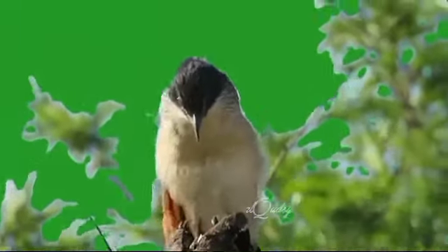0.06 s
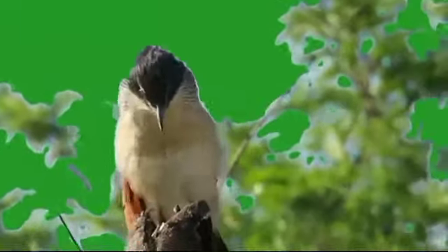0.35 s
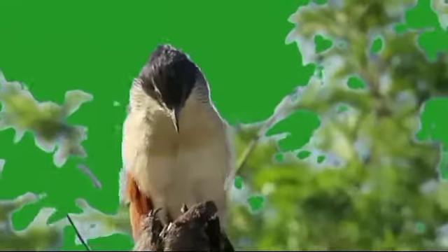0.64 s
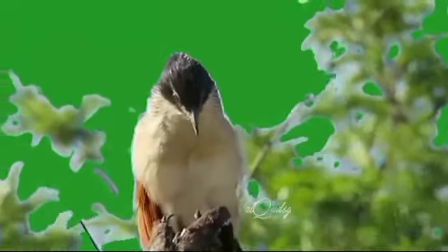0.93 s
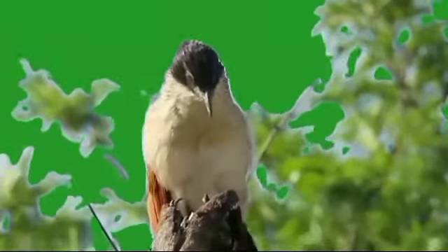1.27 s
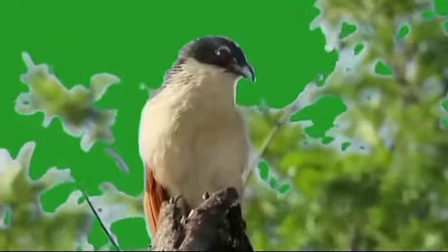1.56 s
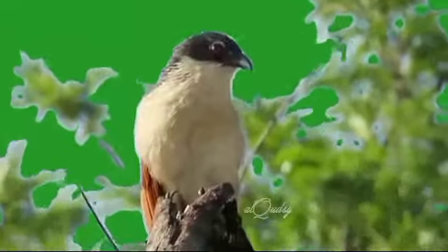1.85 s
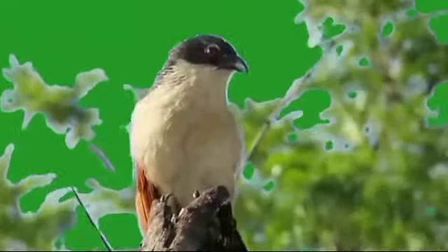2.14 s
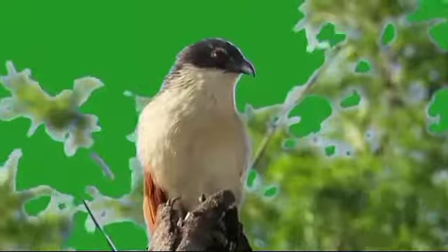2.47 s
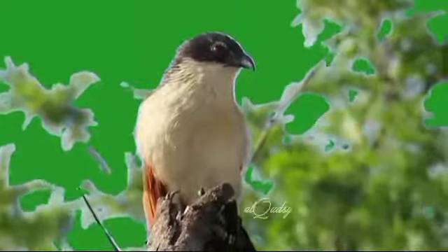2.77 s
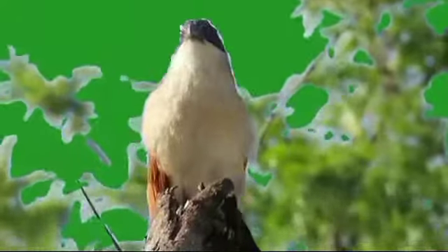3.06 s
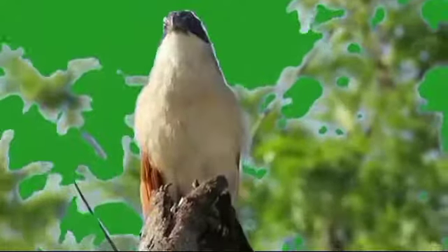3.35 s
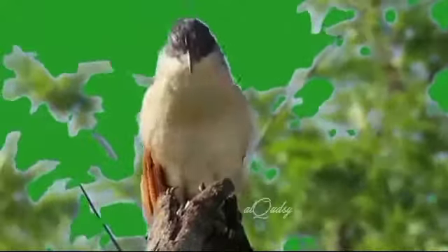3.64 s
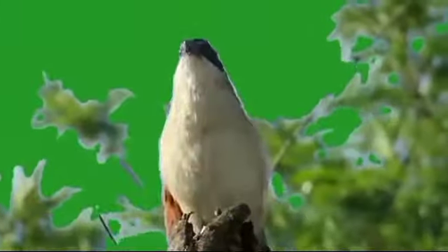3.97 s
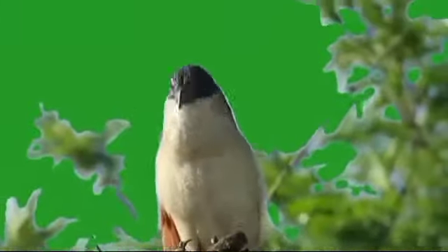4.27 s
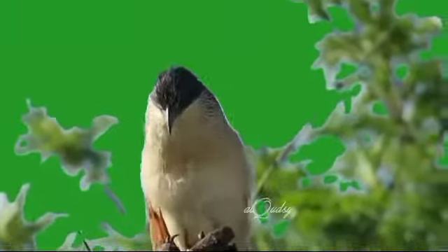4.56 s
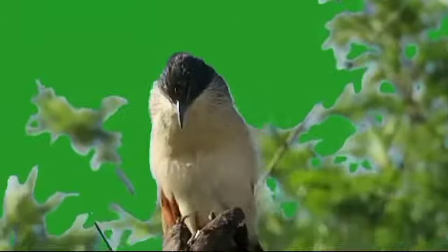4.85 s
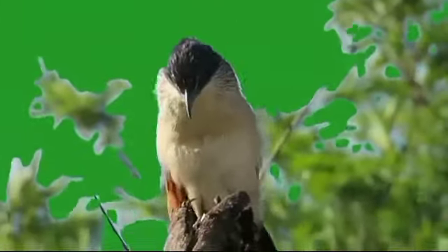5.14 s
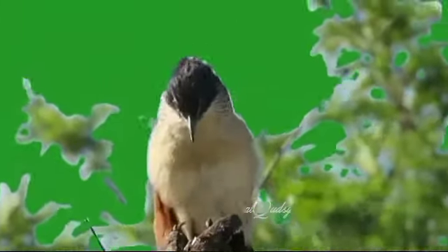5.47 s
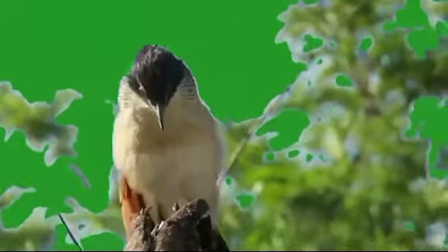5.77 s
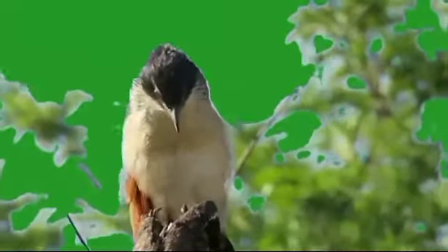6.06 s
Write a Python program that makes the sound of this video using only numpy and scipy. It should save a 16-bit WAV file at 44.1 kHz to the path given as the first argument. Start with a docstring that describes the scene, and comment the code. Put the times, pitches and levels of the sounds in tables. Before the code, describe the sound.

Low, pure bird hoots tumble downward in repeated runs in the bush, amid steady crickets and the thin whistles of small birds.

```python
"""In the bush, a coucal (a large cuckoo) on a stump hoots in quick falling runs, and others answer.
The hoots are almost pure tones from a swollen throat. Crickets rub their wings to chirp near 5 kHz,
and higher insects trill and buzz. Small birds throw in thin whistles and sharp chips, the chips sung
with both sides of the voice box at once. Everything scatters off trunks and leaves, over a soft hush.
Two soft gusts rumble on the microphone; the loudest chips overload it."""
import sys
import numpy as np
from scipy import signal
from scipy.io import wavfile
from scipy.ndimage import uniform_filter1d, map_coordinates

SR = 44100
rng = np.random.default_rng(int(sys.argv[2]) if len(sys.argv) > 2 else 0)


def wrap_up_sound(samples):
    """Save the sound to the file named by the first command line argument, as 16-bit audio."""
    columns = np.atleast_2d(samples).T
    # keep every value between -1 and 1, then stretch to whole-number steps
    tamed = np.clip(columns, -1, 1)
    steps = np.round(tamed * 32767).astype(np.int16)
    wavfile.write(sys.argv[1], SR, steps)


N = 269451
TIME = np.arange(N) / SR

# runs of the near coucals: (start [s], cut-off time [s], level [dB], pitch of first falling hoot [Hz])
NEAR_RUNS = [(-.856, .906, -7, 445), (1.464, 3.24, -3.6, 446), (3.712, 3.99, -13.5, 444),
             (4.554, 6.03, -7.3, 448), (5.835, 6.15, -4.2, 449)]
# the long and the short hoot that open a run: (delay [s], length [s], extra level [dB])
OPENING_HOOTS = [(0, .117, 1), (.158, .05, -.5)]
# runs of farther coucals:
# (first hoot [s], last hoot [s], step [s], first pitch [Hz], last pitch [Hz],
#  first level [dB], last level [dB])
FAR_RUNS = [(0.146, 1.391, .125, 454, 421.5, -40, -34), (2.45, 4.22, .099, 445, 403, -20.5, -27),
            (3.02, 3.92, .112, 358, 326, -24.5, -35)]
# chirps of the nearest cricket: (time [s], level [dB])
NEAR_CHIRPS = [(.133, -8), (.442, -10), (.781, -10), (1.115, -11), (1.41, -8.5), (1.74, -7.5), (2.099, -10),
               (2.404, -8.5), (2.756, -9.5), (3.095, -11), (3.401, -11), (3.706, -11), (4.034, -11),
               (4.343, -11.5), (4.664, -8), (4.979, -7.5), (5.294, -11), (5.646, -10), (5.972, -10.5)]
# bouts of a farther cricket:
# (first chirp [s], last chirp [s], step [s], pitch [Hz], first level [dB], last level [dB])
CHIRP_BOUTS = [(.01, .84, .275, 4730, -17, -21), (1.16, 2.24, .27, 4790, -24, -16.5),
               (2.62, 3.48, .43, 4800, -18, -20), (3.76, 4.307, .275, 4880, -24, -24),
               (4.58, 5.955, .275, 4890, -19, -16.5)]
# two-voiced bird chips:
# (time [s], level [dB], top of low voice [Hz], top of high voice [Hz],
#  high voice gain [dB], rasp gain [dB])
BIRD_CHIPS = [(.111, -9.5, 4250, 5650, -4, -5.5), (.874, -9.5, 3450, 4630, -1, -3),
              (1.348, -3, 3900, 5400, 0, 0), (1.909, -6, 3600, 5280, 3, 1), (2.62, -18.5, 3600, 5240, 9, 5),
              (3.219, -19.5, 3950, 5360, 7, -3), (3.388, -15, 3750, 5420, 5, -11),
              (4.546, -12, 4150, 5600, -5, -10), (4.78, -18.5, 3650, 4765, 5, 4),
              (5.064, -20.5, 3000, 4070, 5, 5), (5.354, -19, 3750, 4960, 6, 3),
              (5.454, -8, 3950, 5350, 3, 1.5), (5.795, -8.5, 4100, 5280, -2, -5),
              (6.007, -16, 3550, 5125, 7, 4)]
# the path of one loud, swooping whistle: (time [s], pitch [Hz])
SWOOP_PATH = [(.16, 6220), (.178, 7250), (.2, 7300), (.212, 4500), (.219, 4130), (.232, 5850), (.239, 5360)]
# a far bird's drooping peeps: (start [s])
PEEP_STARTS = [.148, .795, 1.545, 2.305, 2.785, 3.29, 3.79, 4.487, 4.902, 5.502, 6.015]
# another far bird's quick falling notes: (start [s])
FALLING_STARTS = [.238, .296, .715, 1.44, 2.68, 4.08]
# its quick rising notes: (start [s])
RISING_STARTS = [.38, 1.04, 1.235, 1.375, 1.78]
# single far whistles: (start [s], length [s], first pitch [Hz], last pitch [Hz], level [dB])
FAR_WHISTLES = [(.45, .23, 4100, 3350, -30), (2.166, .083, 6830, 5800, -28),
                (2.17, .098, 5490, 4910, -21.5), (5.118, .1, 2770, 2660, -24.5),
                (5.092, .22, 1386, 1470, -38), (5.612, .06, 2500, 1940, -29.5)]
# where each swell of the 8 kHz insect stops short: (time [s])
SWELL_ENDS = [.267, .787, 1.357, 1.984, 2.571, 3.199, 4.062, 4.579, 5.103, 5.698, 6.25]
# bouts of the fast 6 kHz trill: (start [s], end [s], level in the middle [dB])
TRILL_BOUTS = [(-.3, .4, -35), (.88, 1.45, -27.5), (2.0, 2.85, -27.5), (3.55, 4.4, -28.5),
               (4.97, 5.62, -28.5), (5.65, 6.3, -38)]
# loudness of the far cricket chorus: (time [s], level [dB])
CHORUS_LEVELS = [(0, -24.5), (.9, -31), (1.5, -27), (2.3, -37), (4.2, -36), (6.11, -40.5)]
# dry ticks in the bush: (time [s], level [dB])
DRY_TICKS = [(.718, -17), (5.084, -17)]
# puffs of wind, four to a gust: (time [s], level [dB], half length [s])
WIND_PUFFS = [(1.33, -28.5, .04), (1.49, -33, .07), (1.65, -27.5, .04), (1.79, -35, .06), (3.67, -24, .045),
              (3.82, -27.5, .07), (3.96, -24, .04), (4.1, -28.5, .06)]
# tone colour of wind on the microphone: (frequency [Hz], relative level [dB])
RUMBLE_SPECTRUM = [(20, -16), (38, -7), (55, 0.5), (85, -6.5), (125, -7.5), (200, -15.5), (400, -43),
                   (2000, -32), (4000, -62)]
# tone colour of the background hush: (frequency [Hz], relative level [dB])
HUSH_SPECTRUM = [(25, 1), (55, 0.5), (120, -2.5), (250, -3.5), (600, -4), (900, -4.5), (1200, -7),
                 (2000, -7), (2600, -5), (3100, -5.3), (4500, -11), (5600, -6), (7200, -13.5), (10000, -16)]
# how alike the noise is on the left and right: (frequency [Hz], likeness [0 to 1])
STEREO_LIKENESS = [(30, 1), (70, 0.75), (160, 0.19), (600, 0.8), (1500, .85), (3000, 0.82), (6000, 1)]


def near_coucals():
    """The near birds all sing the same run of hoots, some breaking off early."""
    out = np.zeros(N)
    for run in NEAR_RUNS:
        for start, length, db, hz in hoot_run(*run):
            add(out, start, hoot(length, db, hz))
    return out


def hoot_run(start, end, db, hz, quick_step_s=.112, slow_step_s=.160, sag_hz=6.2, fade_db=.85):
    """Plans a run: two higher hoots, then each slower, lower and weaker until the bird is out of air."""
    hoots = [(start + delay, length, db + extra, hz * 1.036) for delay, length, extra in OPENING_HOOTS]
    age = .238  # seconds into the run
    for k in range(11):
        step = slow_step_s + (quick_step_s - slow_step_s) * np.exp(-k / 2.85)
        length = min(.655 * step, end - start - age)
        breathless_db = 13 * np.exp((age - 1.68) / .175)
        if length > .01:
            hoots.append((start + age, length, db - fade_db * k - breathless_db, hz - sag_hz * k))
        age += step
    return hoots


def hoot(length, db, hz, top_hz=495, rise_s=.033, fall_s=.025):
    """An almost pure tone from the swollen throat: it dips to hz and lifts again as it grows louder."""
    t = np.arange(0, length, 1 / SR)
    progress = t / length
    pitch = hz + .6 * (top_hz - hz) * (2 * (progress - .432)) ** 2
    voice = tone(pitch * (1 + .004 * wobble(t, 120)))
    octave = amp(-38) * voice ** 2  # squaring a tone doubles its pitch
    fade_in = np.sin(np.pi / 2 * np.minimum(t / rise_s, 1))
    fade_out = np.sin(np.pi / 2 * np.minimum((length - t) / fall_s, 1)) ** 2
    swell_db = 5 * np.minimum(progress - .65, 0)
    return amp(db + swell_db) * fade_in * fade_out * (voice + octave).real


def far_coucals(hoot_s=.0684):
    """Farther birds answer with even runs of short hoots that sink in pitch."""
    out = np.zeros(N)
    for first, last, step, hz0, hz1, db0, db1 in FAR_RUNS:
        count = round((last - first) / step) + 1
        for start, db, hz in np.linspace((first, db0, hz0), (last, db1, hz1), count):
            add(out, start, hoot(hoot_s, db, hz))
    return out


def crickets(near_hz=5140, drift=.005, half_stroke_s=.02):
    """One close cricket with sharply ringing wings, and a softer one that chirps in even bouts."""
    out = np.zeros(N)
    for time, db in NEAR_CHIRPS:
        hz = near_hz * (1 + drift * rng.normal())
        strokes = chirp(hz, db, slide=.095, width_hz=90, scrape_db=-21, early_s=.003)
        add(out, time - half_stroke_s, strokes)
    for first, last, step, bout_hz, db0, db1 in CHIRP_BOUTS:
        count = round((last - first) / step) + 1
        for time, db in np.linspace((first, db0), (last, db1), count):
            hz = bout_hz * (1 + drift * rng.normal())
            strokes = chirp(hz, db, slide=.065, width_hz=200, scrape_db=-22, early_s=.002)
            add(out, time - half_stroke_s, strokes)
    return out


def chirp(hz, db, slide, width_hz, scrape_db, early_s, cycles_apart=176, growth_db=.4):
    """Three wing strokes: each slows, flares as it passes the wing's own pitch and leaves it ringing."""
    t = np.arange(-.02, .025, 1 / SR)
    resonance = np.exp((2j * np.pi * hz - np.pi * width_hz) / SR)  # narrower rings longer
    out = np.zeros(SR // 6)
    for k in range(3):
        scrape = tone(hz * (1 - slide * (t + early_s) / .02 + .003 * wobble(t, 300)))
        scrape *= np.hanning(len(t)) * (1 + .25 * wobble(t, 450))
        ring = signal.lfilter([1 - abs(resonance)], [1, -resonance], scrape)
        wing = ring + amp(scrape_db) * scrape
        add(out, k * cycles_apart / hz, amp(db + growth_db * k) * wing.real / abs(wing).max())
    return out


def near_birds(catch_lead_s=.018):
    """Sharp, raspy chips: the voice catches in a weak, lower sweep just before the full one."""
    out, t = np.zeros(N), np.arange(-.05, .03, 1 / SR)
    for time, db, low_hz, high_hz, high_db, rasp_db in BIRD_CHIPS:
        catch = voice_box(t + catch_lead_s, .9 * low_hz, .9 * high_hz, high_db=0)
        rasp = band_noise(t, 2600, 7500) * np.exp(-((t + .006) / .018) ** 2)
        hoarseness = amp(-12) * catch + amp(-11.5) * rasp
        chip = voice_box(t, low_hz, high_hz, high_db) + amp(rasp_db) * hoarseness
        add(out, time + t[0], amp(db) * chip)
    return out


def voice_box(t, low_hz, high_hz, high_db, sweep_s=.024, rise_s=.0065, fall_s=.008):
    """Both sides of a bird's voice box sweep up, hoarse at first and clean at the top, near t = 0."""
    def swell(t):
        return np.where(t < 0, np.exp(1 - np.hypot(1, t / rise_s)), np.exp(-(t / fall_s) ** 2))

    glide = 1 - .36 * (1 - np.exp(-(1.6 * (t - .004) / sweep_s) ** 2))
    hoarse = np.clip(-t / sweep_s + .15, .05, 1)
    low, high = (tone(hz * glide * (1 + .022 * hoarse * wobble(t, 1500))) for hz in (low_hz, high_hz))
    low_voice = swell(t) * (low + amp(-18) * low ** 2).real
    high_voice = amp(high_db) * swell(t + .0018) * high.real
    flicker = np.exp(.25 * wobble(t, 330))
    # while hoarse, the two sides pulse at half their pitch gap, adding tones between and beside them
    beating = 1 + .9 * hoarse * tone((high_hz - low_hz) / 2 * glide).real
    return (low_voice + high_voice) * flicker * beating


def swoop(db=-5.5, rise_s=.026, fall_s=.008, echo_s=.005):
    """One loud, slightly rough whistle arches, dives and flicks up again, with a close echo."""
    out, (times, hz) = np.zeros(N), np.transpose(SWOOP_PATH)
    start, end = times[0], times[-1]
    t = np.arange(start, end, 1 / SR)
    pitch = uniform_filter1d(np.interp(t, times, hz), size=150)
    dive_db = -4 * (hz.max() - pitch) / np.ptp(hz)  # the voice weakens as it dives
    fades = np.minimum((t - start) / rise_s, 1) * np.minimum((end - t) / fall_s, 1)
    loudness = fades * amp(db + dive_db) * (1 + .2 * wobble(t, 500))
    voice = loudness * tone(pitch * (1 + .009 * wobble(t, 980))).real
    add(out, start, voice)
    add(out, start + echo_s, amp(-11) * voice)
    return out


def far_birds(twitter_db=-35.5):
    """Repeated peeps, quick sliding notes and single whistles, over a faint twitter."""
    out = np.zeros(N)
    for start in PEEP_STARTS:
        add(out, start, note(length=.058, first_hz=3420, last_hz=3120, db=-21.5))
    for start in FALLING_STARTS:
        add(out, start, note(length=.037, first_hz=4030, last_hz=3100, db=-25.5))
    for start in RISING_STARTS:
        add(out, start, note(length=.04, first_hz=3400, last_hz=4200, db=-28))
    for start, *shape in FAR_WHISTLES:
        add(out, start, note(*shape))
    for when, length, pitch, slide, size in rng.random((60, 5)):
        hz = 2400 + 1700 * pitch
        twitter = note(.025 + .03 * length, hz, hz * (.7 + .55 * slide), twitter_db + 9 * size, .008)
        add(out, when ** 1.5 * N / SR, twitter)  # the twitter thins out with time
    return out


def high_insects(swell_s=.33, pair_step_s=.0362, pair_gap_s=.009, trill_step_s=.0168):
    """A thin, steady whine, plus tiny falling scrapes: some in swelling pairs, some in a fast trill."""
    out = amp(-43) * wobble(TIME, 260) * tone(np.full(N, 8350)).real  # the whine
    for end in SWELL_ENDS:
        for time_left in np.arange(2 * pair_gap_s, swell_s, pair_step_s):
            level = -23 - 13 * (time_left / swell_s) ** 2
            for delay in (0, pair_gap_s):
                scrape = note(.008, 8400, 7800, level + rng.normal(0, 1.5), waver=.02, wavers_per_s=1200)
                add(out, end - time_left + delay + rng.normal(0, .00034), scrape)
    for start, end, db in TRILL_BOUTS:
        for time in np.arange(start, end, trill_step_s):
            from_middle = 2 * (time - start) / (end - start) - 1
            level = db - 9 * from_middle ** 2 + rng.normal(0, .67)
            onset = time + rng.normal(0, .0015)
            add(out, onset, note(.013, 6800, 5750, level, waver=.035, wavers_per_s=1200))
    return out


def insect_buzz(start_s=3.15):
    """A faint, grainy buzz swells, creeps up in pitch and fades."""
    out = np.zeros(N)
    add(out, start_s, note(length=2, first_hz=5550, last_hz=5900, db=-35, waver=.007))
    return out * wobble(TIME, 200)


def cricket_chorus(hz=4770, width_hz=330):
    """Many far crickets blur into one throbbing ring."""
    blur = wobble(TIME, width_hz) + 1j * wobble(TIME, width_hz)
    ring = (blur * tone(np.full(N, hz))).real
    throb = np.exp(.71 * wobble(TIME, 55))
    return amp(np.interp(TIME, *np.transpose(CHORUS_LEVELS))) * unit_level(ring * throb)


def ticks(decay_s=.003):
    """Dry snaps: bursts of noise that die away at once."""
    out, t = np.zeros(N), np.arange(SR // 30) / SR
    for time, db in DRY_TICKS:
        add(out, time, amp(db) * np.exp(-t / decay_s) * band_noise(t, 1000, 3800))
    return out


def far_cooing(db=-44.5, hz=960):
    """Very distant birds merge into a faint, pulsing coo."""
    coo = wobble(TIME, 70) * tone(hz * (1 + .035 * wobble(TIME, 9))).real
    throb = np.exp(.27 * wobble(TIME, 11))
    return amp(db) * unit_level(coo * throb)


def gusts():
    """Puffs of wind on the microphone swell and die as a low rumble."""
    loudness = sum(amp(db) * np.exp(-((TIME - time) / half) ** 2) for time, db, half in WIND_PUFFS)
    return loudness * air_noise(RUMBLE_SPECTRUM, patchy_db=-1.5)


def air_noise(spectrum, patchy_db):
    """Rushing noise with drifting louder and softer patches, partly alike on the left and right."""
    frames, hz = N // 512 + 5, np.fft.rfftfreq(2048, 1 / SR)
    a, b, c, d, patches = rng.standard_normal((5, frames, len(hz)))
    patches = uniform_filter1d(patches, size=7, axis=0)  # smooth over time
    patches = unit_level(uniform_filter1d(patches, size=16, axis=1))  # and over frequency
    likeness = value_at(STEREO_LIKENESS, hz)
    left = a + 1j * b
    right = likeness * left + np.sqrt(1 - likeness ** 2) * (c + 1j * d)
    spectra = np.array([left, right]) * amp(value_at(spectrum, hz) + patchy_db * patches)
    _, noise = signal.istft(spectra.swapaxes(1, 2), nperseg=2048, noverlap=1536)
    return unit_level(noise[:, :N])


def thicket(sound, echo_db, decay_s, spread=.2):
    """A sound plus its echoes off trunks and leaves, which fade by 60 dB in decay_s."""
    t = np.arange(SR * 3 // 4) / SR
    signs = rng.choice([-1., 1.], (2, len(t)))
    arrivals = (rng.random((2, len(t))) < 1 / 20) & (t > .006)
    echoes = signs * arrivals * amp(-60 * t / decay_s)
    middle, side = signal.fftconvolve(sound[None], echoes / np.linalg.norm(echoes[0]), axes=1)[:, :N]
    return sound + amp(echo_db) * np.array([middle + spread * side, middle - spread * side])


def note(length, first_hz, last_hz, db, waver=.009, wavers_per_s=250):
    """A wavering whistle with soft ends that slides faster and faster in pitch."""
    t = np.arange(0, length, 1 / SR)
    glide = first_hz * (last_hz / first_hz) ** ((t / length) ** 1.4)
    pitch = glide * (1 + waver * wobble(t, wavers_per_s))
    return amp(db) * np.sin(np.pi * t / length) ** 2 * tone(pitch).real


def tone(hz):
    """A tone that follows a pitch curve, as complex numbers; .real gives the sound wave."""
    return np.exp(2j * np.pi * (np.cumsum(hz) / SR + rng.random()))


def wobble(t, per_s):
    """A smooth random curve of size about 1, passing through per_s random values a second."""
    return map_coordinates(rng.standard_normal(4096), [(t - t[0]) * per_s], order=3, mode="wrap")


def band_noise(t, low_hz, high_hz):
    """Hiss between two frequencies."""
    band = signal.butter(2, [low_hz, high_hz], "band", fs=SR, output="sos")
    return unit_level(signal.sosfilt(band, rng.standard_normal(len(t))))


def lowpass(sound, hz):
    """Cuts away the treble above hz in both channels."""
    return signal.oaconvolve(sound, signal.firwin(401, hz, window=("kaiser", 9), fs=SR)[None], "same")


def amp(db):
    """Turns decibels into a number to multiply by."""
    return 10 ** (np.asarray(db) / 20)


def unit_level(x):
    """Scales a signal to an average (rms) level of 1."""
    return x / np.sqrt(np.mean(x ** 2) + 1e-20)


def value_at(table, hz):
    """Reads between the rows of a table, on a log-frequency scale."""
    table_hz, values = np.transpose(table)
    return np.interp(np.log(hz + 1), np.log(table_hz + 1), values)


def add(mix, start_s, sound):
    """Mixes a sound in at start_s, dropping whatever sticks out at either end."""
    at = int(round(start_s * SR))
    sound = sound[max(-at, 0):]
    part = mix[max(at, 0):][:len(sound)]
    part += sound[:len(part)]


def scene():
    """Birds and insects in the thicket, over the gusts and the hush of the bush."""
    hoots = thicket(near_coucals(), echo_db=-18.5, decay_s=.88, spread=.8)
    hoots += thicket(far_coucals() + far_cooing(), echo_db=-8.5, decay_s=.98, spread=.7)
    birds = thicket(near_birds() + swoop() + ticks(), echo_db=-16, decay_s=.17)
    birds += thicket(far_birds(), echo_db=-7, decay_s=.35)
    insects = thicket(crickets(), echo_db=-10, decay_s=.31)
    insects += thicket(high_insects() + insect_buzz() + cricket_chorus(), echo_db=-5, decay_s=.2)
    return hoots + birds + insects + gusts() + amp(-29) * air_noise(HUSH_SPECTRUM, patchy_db=2.5)


def record(dry):
    """The microphone misses the highest treble and overloads on peaks; the very top is then cut off."""
    picked_up = lowpass(dry, hz=10350)
    overloaded = np.clip(picked_up, -1, 1)
    return lowpass(overloaded, hz=15700)


dry = scene()
out = record(dry)
wrap_up_sound(out)
```